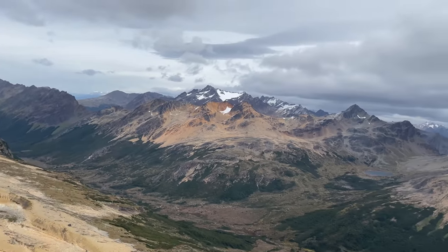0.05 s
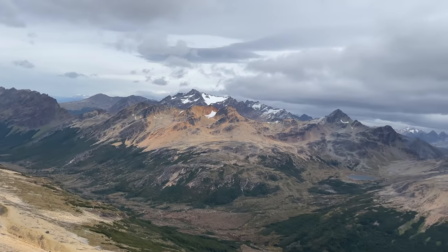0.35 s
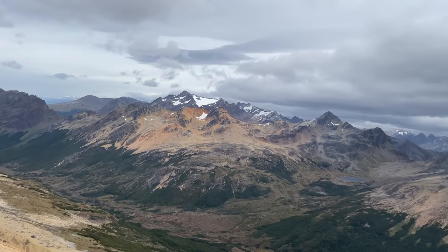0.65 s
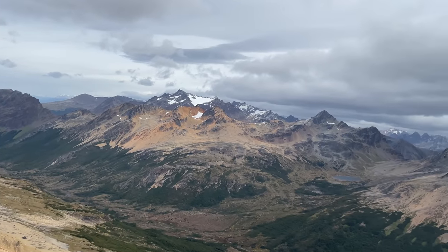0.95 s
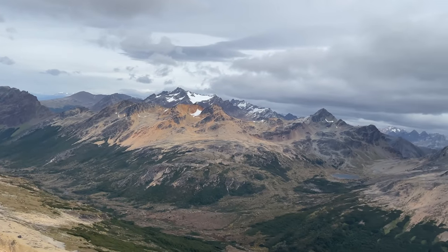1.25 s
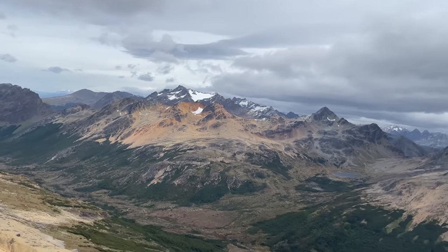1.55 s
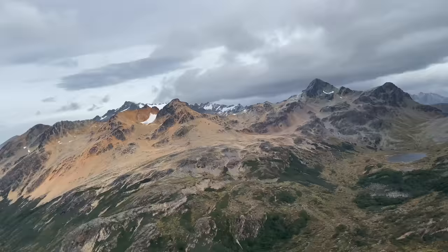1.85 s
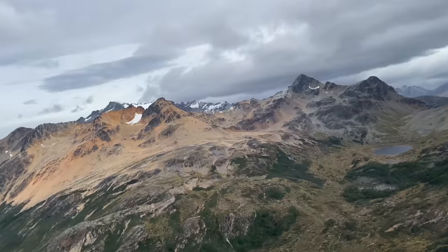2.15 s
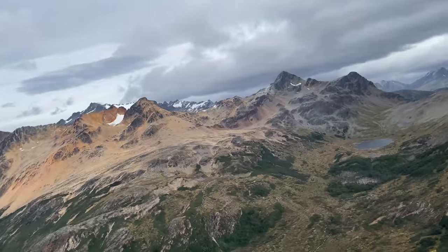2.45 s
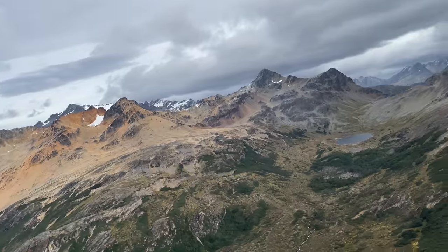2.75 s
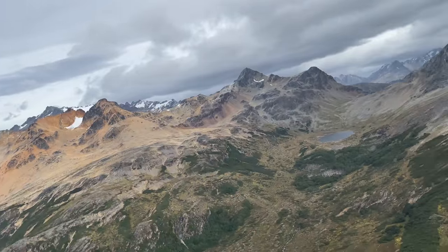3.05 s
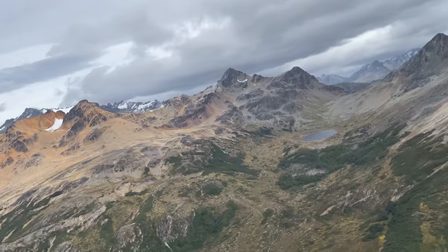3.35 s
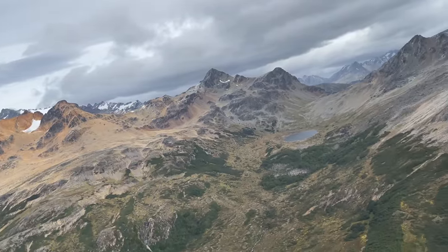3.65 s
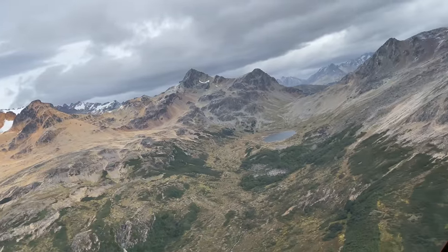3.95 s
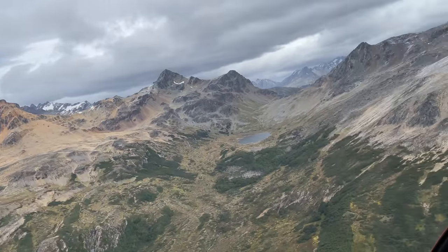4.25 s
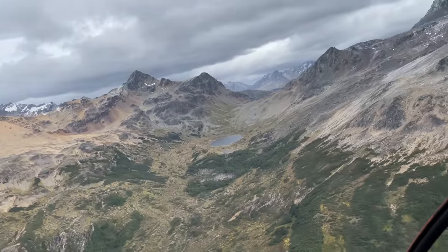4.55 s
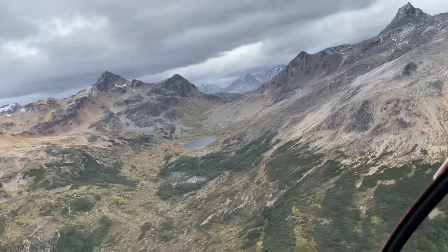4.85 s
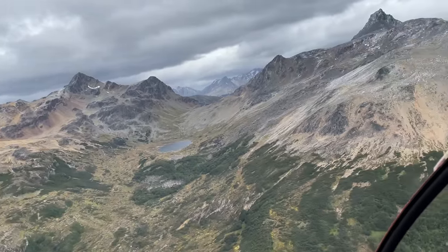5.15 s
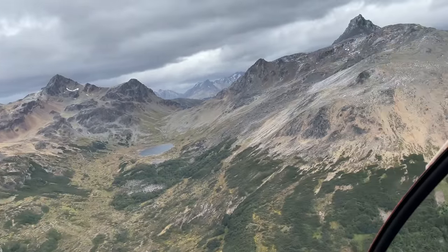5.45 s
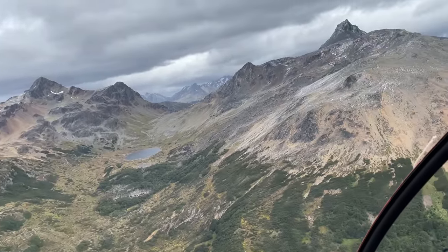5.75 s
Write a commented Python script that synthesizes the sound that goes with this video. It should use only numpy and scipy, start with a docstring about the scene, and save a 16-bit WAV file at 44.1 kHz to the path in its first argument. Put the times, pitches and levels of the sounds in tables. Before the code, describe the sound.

A helicopter drones steadily from inside the cabin, with a low engine hum and rushing air, then its blades start slapping in a turn.

```python
"""A six-cylinder piston engine hums at its firing rate, heard in the cabin of a two-bladed helicopter.
Geared to it, the main rotor thumps on the cabin and the tail rotor buzzes. Air roars, hisses along the
canopy and whistles through a gap; a fixture ticks once. A brief dip in level joins a stretch of cruise
to a banked turn, in which the blades slap against their own wake."""
import sys
import numpy as np
from scipy import signal
from scipy.fft import rfft, irfft, next_fast_len
from scipy.io import wavfile
from scipy.ndimage import uniform_filter1d, minimum_filter1d, map_coordinates

SR = 44100
rng = np.random.default_rng(int(sys.argv[2]) if len(sys.argv) > 2 else 0)


def generate_wav(sig):
    """Save sig (samples, or channels by samples) to the path in sys.argv[1] as 16-bit PCM at SR."""
    pcm = np.round(np.clip(np.atleast_2d(sig).T, -1, 1) * 32767).astype(np.int16)
    wavfile.write(sys.argv[1], SR, pcm)


N = 265041
TURN_START_S = 1.886
MAIN_PASSES_PER_FIRING, TAIL_PASSES_PER_FIRING = 0.1, 0.597


def amp(db):
    return 10 ** (np.asarray(db) / 20)


def unit_rms(x):
    return x / np.sqrt(np.mean(x ** 2) + 1e-20)


def clock():
    return np.arange(N) / SR


def curve(rows):
    """(s, value) rows interpolated to every sample."""
    return np.interp(clock(), *np.transpose(rows))


def by_leg(cruise, turn):
    return np.where(clock() < TURN_START_S, cruise, turn)


def wobble(rate_hz):
    """Smooth random curve."""
    return map_coordinates(rng.standard_normal(int(N * rate_hz / SR) + 4), [clock() * rate_hz])


def gain_at(spectrum, hz):
    """Gain of (Hz, dB) rows on a log frequency axis."""
    knots_hz, db = np.transpose(spectrum)
    return amp(np.interp(np.log(hz + 1), np.log(knots_hz + 1), db))


def filtered(x, response):
    size = next_fast_len(N + SR // 2)
    return irfft(rfft(x, size) * response(np.fft.rfftfreq(size, 1 / SR)), size)[:N]


def noise(spectrum):
    return unit_rms(filtered(rng.standard_normal(N), lambda hz: gain_at(spectrum, hz)))


def ring(spectrum, size=16384):
    """Minimum-phase impulse response, peak 1."""
    cepstrum = irfft(np.log(gain_at(spectrum, np.fft.rfftfreq(size, 1 / SR))))
    cepstrum[1:size // 2] *= 2
    cepstrum[size // 2 + 1:] = 0
    response = irfft(np.exp(rfft(cepstrum)))
    return response / np.abs(response).max()


def pulses(times_s, gains, shape):
    """One scaled copy of the shape at each time."""
    starts = np.clip(np.round(times_s * SR).astype(int), 0, N)
    train = np.bincount(starts, gains, N + 1)[:N]
    return signal.fftconvolve(train, shape)[:N]


def harmonics(rows, cycles, waver_db, drift_rad, rate_hz):
    """Harmonics of a shaft; turbulent air shakes the level and phase of each."""
    total = np.zeros(N)
    for multiple, cruise_db, turn_db in rows:
        level = amp(by_leg(cruise_db, turn_db) + waver_db * wobble(rate_hz))
        phase = 2 * np.pi * (multiple * cycles + rng.random()) + drift_rad * wobble(rate_hz)
        total += level * np.sqrt(2) * np.sin(phase)
    return total


def fixture_tick(at_s=0.2441, ring_hz=2900, ring_db=-30, ring_t60_s=0.06, click_db=-23, click_t60_s=0.022):
    """A cabin fixture ticks once and rings briefly."""
    t = clock()[:SR // 10]
    tone = amp(ring_db - 60 * t / ring_t60_s) * np.sin(2 * np.pi * ring_hz * t)
    click = amp(click_db - 60 * t / click_t60_s) * noise(CRACK_SPECTRUM)[:len(t)]
    return pulses(np.array([at_s]), np.ones(1), tone + click)


def gap_whistle(cruise_hz=9270, turn_hz=8660, wander_hz=45, width_hz=330, rise_s=0.79):
    """Air through a gap: a breathy band that builds up, wanders and sits lower in the turn."""
    hz = by_leg(cruise_hz, turn_hz) + wander_hz * wobble(2)
    level = amp(by_leg(-50.5, -54.5) + 1.5 * wobble(2.15))
    fade_in = np.minimum(1, clock() / rise_s) ** 2
    flutter = unit_rms(filtered(rng.standard_normal(N), lambda f: np.exp(-(f / width_hz) ** 2)))
    return level * fade_in * np.sqrt(2) * flutter * np.sin(2 * np.pi * np.cumsum(hz) / SR)


def canopy_reflections(hiss, depth_db=0.9, span_bins=5, span_frames=260):
    """Reflections tint the hiss with peaks that come and go as the listener moves."""
    spectra = signal.stft(hiss, nperseg=512)[2]
    tint = uniform_filter1d(rng.standard_normal(spectra.shape), span_bins, axis=0)
    tint = uniform_filter1d(tint, span_frames, axis=1)
    tinted = spectra * amp(depth_db * unit_rms(tint))
    return unit_rms(signal.istft(tinted, nperseg=512)[1][:N])


# Air noise spectra. Each row: frequency in Hz, relative level in dB.
ROAR_SPECTRUM = [(20, -49), (45, -21), (90, -5.5), (130, 1), (220, 1.5), (360, -0.5), (440, -7.5),
                 (650, -10.5), (800, -9.5), (1000, -16.5), (1400, -23.5), (2200, -55), (9000, -90)]
CRUISE_HISS_SPECTRUM = [(820, -6), (1400, -2), (1630, -2), (3230, -1), (3600, 1), (4190, -2), (4820, -2),
                        (6020, -7.5), (6860, -4), (7580, -8), (8470, -8.5), (9180, -6.5), (10000, -11),
                        (13300, -18.5), (15500, -23)]
TURN_HISS_SPECTRUM = [(820, -6.5), (1400, -2), (1640, -3.5), (1800, -5.5), (2250, -4), (2530, -2),
                      (2860, -4.5), (3430, -2.5), (4190, -7), (5900, -7.5), (6590, -10), (8730, -8.5),
                      (11000, -18), (13200, -22), (15500, -29)]


def airflow(firings, hiss_start_db=-35, hiss_fall_db_per_s=0.42, hiss_db_per_slap_db=0.062):
    """Low roar and canopy hiss pulse slightly with firings and blades; the wake lifts the hiss."""
    firing_beat = np.cos(2 * np.pi * firings)
    blade_beat = np.cos(2 * np.pi * MAIN_PASSES_PER_FIRING * firings)
    roar_db = by_leg(-20, -21.5) + 1.02 * wobble(22.08) + 0.45 * firing_beat + 0.1 * blade_beat
    roar = amp(roar_db) * noise(ROAR_SPECTRUM)
    hiss = by_leg(noise(CRUISE_HISS_SPECTRUM), amp(-0.24) * noise(TURN_HISS_SPECTRUM))
    hiss = canopy_reflections(hiss)
    wake_db = curve(WAKE_CONTACT_DB)
    wake_db -= wake_db[clock() > TURN_START_S].mean()
    hiss_db = hiss_start_db - hiss_fall_db_per_s * clock()
    hiss_db += by_leg(0, -1.13 + hiss_db_per_slap_db * wake_db)
    hiss_db += 0.46 * wobble(16) + 0.49 * firing_beat + 0.42 * blade_beat
    return roar + amp(hiss_db) * hiss


# Each row: multiple of the tail blade rate, relative level in dB in cruise, then in the turn.
TAIL_HARMONICS = [(1, -31.5, -36), (2, -34.5, -27.5), (3, -48, -39.5), (4, -44, -36.5), (5, -39, -41.5)]


def tail_rotor(firings):
    """Geared to the engine, it buzzes in the wake of the main rotor."""
    passes = firings * TAIL_PASSES_PER_FIRING
    return amp(1) * harmonics(TAIL_HARMONICS, passes, waver_db=2.5, drift_rad=0.38, rate_hz=5)


def blade_passes(firings, pass_zero_s=3.4608):
    """Number and time of each main blade pass."""
    passes = MAIN_PASSES_PER_FIRING * (firings - np.interp(pass_zero_s, clock(), firings))
    number = np.arange(np.ceil(passes[0]), passes[-1])
    return number, np.interp(number, passes, clock())


# Cabin air and panel responses. Each row: frequency in Hz, relative level in dB.
BOOM_SPECTRUM = [(12, -54), (27, -13), (41, -33), (54, 3), (68, 3), (81, -13.5), (95, 0), (110, 3),
                 (160, -5), (300, -13.5), (900, -56), (5000, -110)]
PANEL_SPECTRUM = [(70, -22.5), (110, 9.5), (170, 8), (240, 1), (390, -6), (440, -10.5), (800, -14),
                  (1100, -23.5), (2000, -55), (8000, -100)]
# Each row: time in seconds, relative boom level in dB.
BOOM_LEVEL_DB = [(0, -27.5), (1.65, -28), (2.05, -30.5), (2.7, -47), (3.35, -30.5), (4.45, -31.5),
                 (5.5, -37), (6.01, -32)]


def rotor_thump(firings, panel_t60_s=0.18, panel_cruise_db=-30, panel_turn_db=-25, scatter_db=1.6):
    """Each passing blade pushes on the cabin: the air booms and the panels drum."""
    _, times_s = blade_passes(firings)
    gains = amp(scatter_db * rng.standard_normal(len(times_s)))
    boom = unit_rms(pulses(times_s, gains, ring(BOOM_SPECTRUM)))
    t = clock()[:SR // 4]
    decay = rng.standard_normal(len(t)) * amp(-60 * t / panel_t60_s)
    panel_ring = signal.fftconvolve(decay, ring(PANEL_SPECTRUM))
    drumming = unit_rms(pulses(times_s, gains, panel_ring))
    return amp(curve(BOOM_LEVEL_DB) + 5) * boom + amp(by_leg(panel_cruise_db, panel_turn_db)) * drumming


def cabin_echo(x, level_db=-16, t60_s=0.05, rise_s=0.0018):
    """Short reverberation off the walls of the small cabin."""
    t = clock()[:SR // 10]
    walls = rng.standard_normal(len(t)) * amp(-60 * t / t60_s) * (1 - np.exp(-t / rise_s))
    return amp(level_db) * signal.fftconvolve(x, walls / np.linalg.norm(walls))[:N]


# How closely the blades meet their wake. Each row: time in seconds, relative slap level in dB.
WAKE_CONTACT_DB = [(2.35, -32), (2.56, -8.5), (2.7, -18.5), (2.87, -9), (3.02, -12), (3.35, -6.5),
                   (3.9, -9.5), (4.49, -14.5), (4.58, -9.5), (4.82, -12.5), (4.97, -19), (5.2, -14.5),
                   (5.5, -25), (5.9, -11)]
# Passes that cut through a vortex core. Each row: time in seconds, relative crack level in dB.
VORTEX_CORE_HITS = [(2.573, -32.5), (2.869, -25), (2.942, -31.5), (3.46, -30.5), (3.534, -31), (3.609, -32),
                    (3.756, -32), (3.904, -31.5), (4.715, -32.5)]


def wake_strikes(firings, blade_gap_db=2, slap_scatter_db=1.4, crack_scatter_db=1.5):
    """Time, slap and crack level of each pass in the turn; one blade runs nearer the wake, so is louder."""
    number, times_s = blade_passes(firings)
    in_turn = times_s > TURN_START_S
    number, times_s = number[in_turn], times_s[in_turn]
    slap_draw, crack_draw = rng.standard_normal((len(times_s), 2)).T
    slap_db = np.interp(times_s, *np.transpose(WAKE_CONTACT_DB))
    slap_db += blade_gap_db / 2 * np.cos(np.pi * number) + slap_scatter_db * slap_draw
    crack_db = slap_db - 37 + crack_scatter_db * crack_draw
    for at_s, db in VORTEX_CORE_HITS:
        crack_db[np.argmin(np.abs(times_s - at_s))] = db
    return times_s, slap_db, crack_db


# Blade slap and torn air. Each row: frequency in Hz, relative level in dB.
SLAP_SPECTRUM = [(60, -21.5), (120, -16.5), (195, -2.5), (225, 11.5), (260, -3), (350, 7), (440, -11.5),
                 (550, 4), (660, -10), (780, -0.5), (1050, -24.5), (1700, -29.5), (4000, -50), (14000, -76)]
CRACK_SPECTRUM = [(400, -34), (1300, 4), (3200, 4.5), (6000, -9.5), (10000, -15), (15000, -47)]


def blade_slaps(firings, lead_s=0.00481, lead_db=-5, jitter_s=0.00044, crack_t60_s=0.028, rise_s=0.0015):
    """A blade cuts two tip vortices: a weak pulse, then a strong one, each with a crack of torn air."""
    strike_s, slap_db, crack_db = wake_strikes(firings)
    time_draw, level_draw = rng.standard_normal((len(strike_s), 2)).T
    times_s = np.concatenate([strike_s - lead_s + jitter_s * time_draw, strike_s])
    gains = amp(np.concatenate([slap_db + lead_db + 2.8 * level_draw, slap_db]))
    slaps = pulses(times_s, gains, ring(SLAP_SPECTRUM))
    slaps = slaps + cabin_echo(slaps)
    t = clock()[:SR // 10]
    puff = amp(-60 * t / crack_t60_s) * (1 - np.exp(-t / rise_s))
    cracks = pulses(times_s - rise_s, amp(np.tile(crack_db, 2)), puff) * noise(CRACK_SPECTRUM)
    return amp(2) * slaps + amp(4.5) * cracks


# Each row: time in seconds, firing rate in Hz.
FIRING_RATE_HZ = [(0, 135.3), (0.85, 135.9), (1.5, 135.5), (2.3, 135.5), (3.4, 135.05), (4.1, 135.6),
                  (4.7, 135.1), (5.4, 135.7), (6.01, 135.9)]


def firing_count():
    """Running count of cylinder firings."""
    return np.cumsum(curve(FIRING_RATE_HZ)) / SR


# Each row: time in seconds, firing tone level in dB.
HUM_LEVEL_DB = [(0, -11.5), (1.4, -12), (1.85, -13.5), (1.92, -10.5), (3.1, -10), (3.8, -14.5),
                (4.5, -11.5), (5.5, -11), (6.01, -14)]
# Each row: multiple of the four-stroke cycle rate, relative level in dB in cruise, then in the turn.
EXHAUST_HARMONICS = [(2, -36, -46), (5, -44, -27.5), (7, -33.5, -38), (8, -50, -55), (9, -33.5, -27.5),
                     (10, -29.5, -33), (11, -52, -38.5), (12, -26.5, -25), (13, -38, -61), (14, -60, -29),
                     (15, -48, -34), (16, -37.5, -59), (17, -35, -34.5), (18, -38.5, -39), (21, -39.5, -38),
                     (24, -47.5, -40.5)]


def engine(firings, cylinders=6):
    """A strong, slightly wavering firing tone; unequal cylinders add weaker lines around it."""
    hum_db = curve(HUM_LEVEL_DB) + 0.41 * wobble(25.14) + 0.27 * wobble(6.1)
    hum = amp(hum_db) * np.sqrt(2) * np.sin(2 * np.pi * firings + 0.046 * wobble(16))
    exhaust = harmonics(EXHAUST_HARMONICS, firings / cylinders, waver_db=1.95, drift_rad=0.22, rate_hz=6)
    return hum + amp(-1.62) * exhaust


def scene():
    """Mono mix; both rotors follow the engine speed."""
    firings = firing_count()
    rotors = rotor_thump(firings) + blade_slaps(firings) + tail_rotor(firings)
    return (engine(firings) + rotors + airflow(firings) + gap_whistle() + fixture_tick())[None]


def limiter(x, ceiling=0.76, window_samples=220):
    """The gain drops just enough to hold the peaks under the ceiling."""
    needed = np.minimum(1, ceiling / (np.abs(x) + 1e-9))
    return x * uniform_filter1d(minimum_filter1d(needed, window_samples), window_samples)


def record(dry, dip_half_width_s=0.031, low_cut_hz=22, high_cut_hz=15700):
    """Peaks are limited, the level dips where the turn begins, and both ends of the spectrum are cut."""
    dip = np.clip(np.abs(clock() - TURN_START_S) / dip_half_width_s, 0.04, 1)
    dipped = limiter(dry[0]) * dip
    return filtered(dipped, lambda hz: (hz < high_cut_hz) * (1 - np.exp(-(hz / low_cut_hz) ** 4)))[None]


dry = scene()
out = record(dry)
generate_wav(out)
```